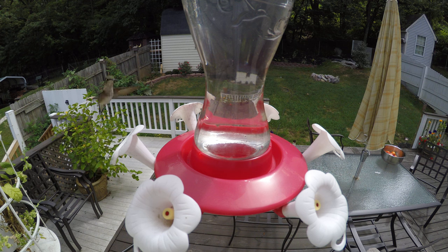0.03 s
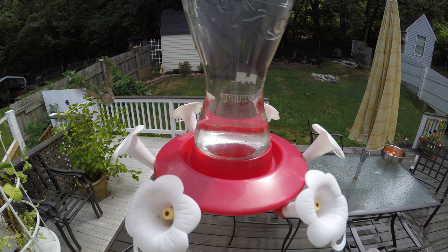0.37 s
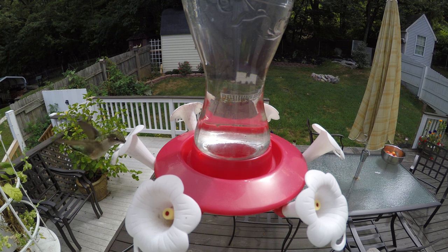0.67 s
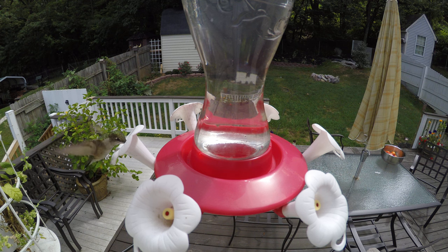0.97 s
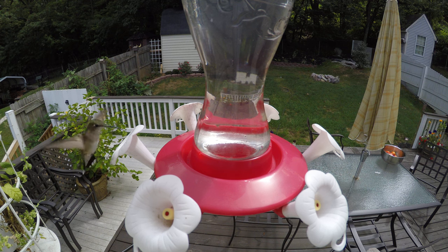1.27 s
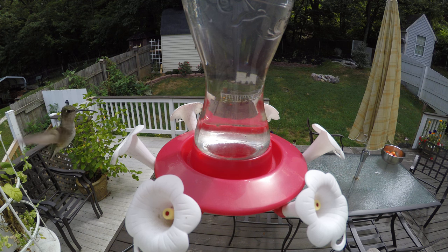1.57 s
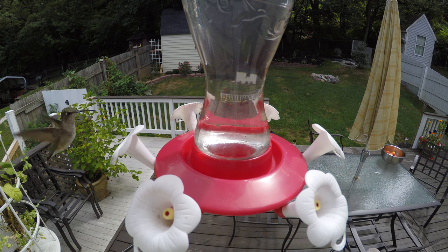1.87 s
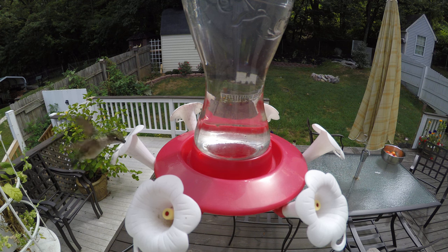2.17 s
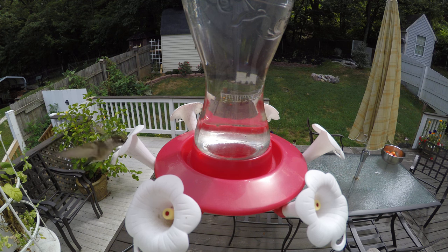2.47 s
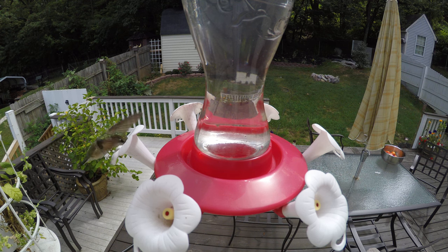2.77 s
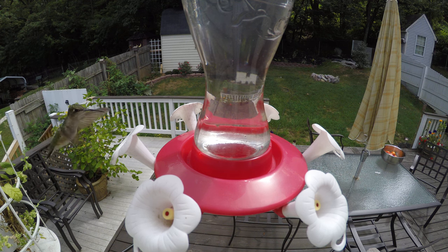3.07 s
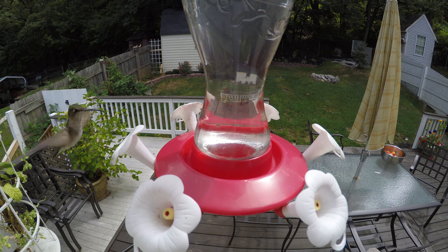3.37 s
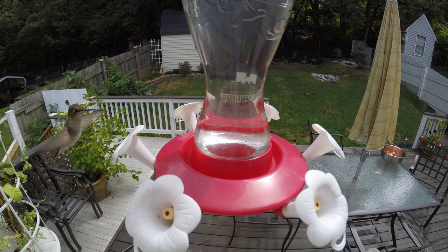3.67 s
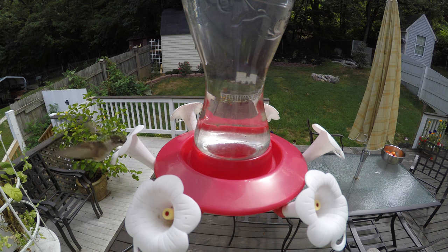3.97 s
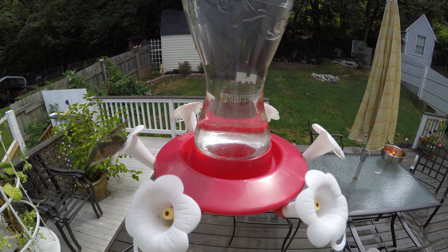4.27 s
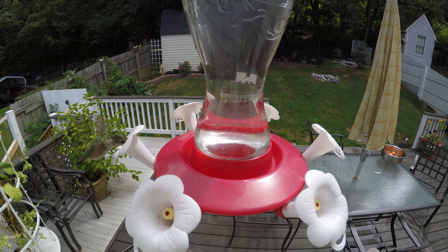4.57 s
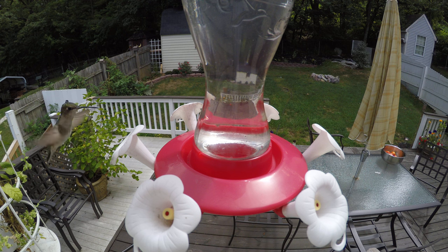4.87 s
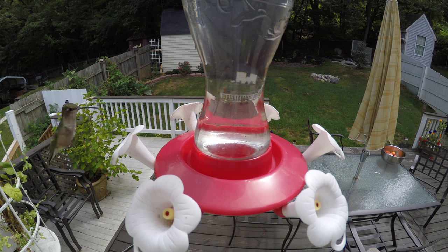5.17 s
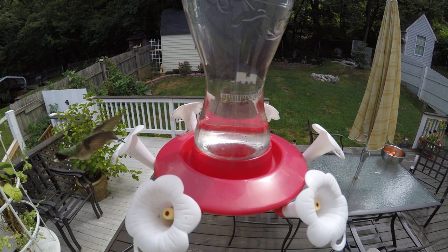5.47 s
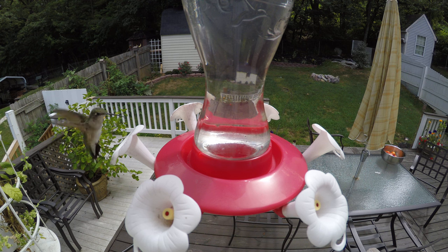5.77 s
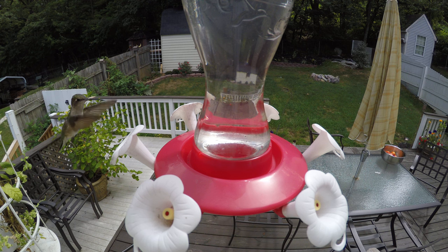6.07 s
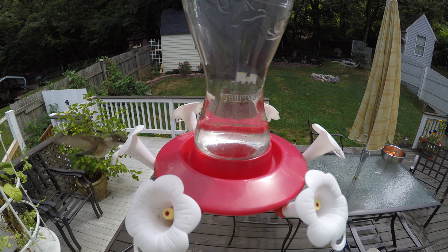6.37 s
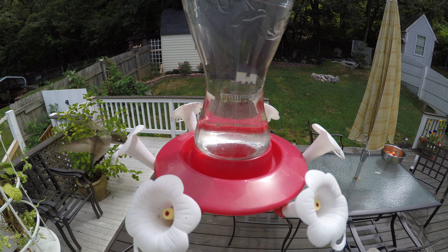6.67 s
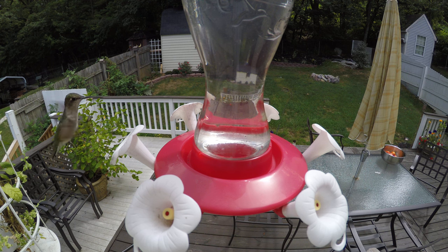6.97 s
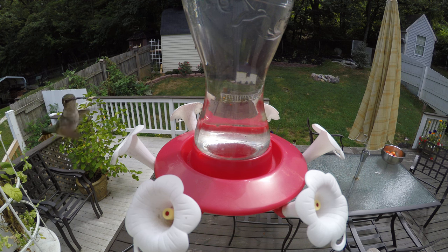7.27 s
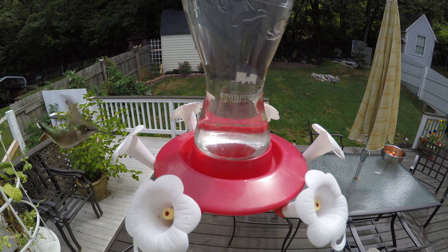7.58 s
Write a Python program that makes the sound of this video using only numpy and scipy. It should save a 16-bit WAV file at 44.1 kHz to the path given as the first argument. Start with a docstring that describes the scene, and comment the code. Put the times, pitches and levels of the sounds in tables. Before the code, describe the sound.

A hummingbird's wings hum close by while a truck drones past in the distance and a cricket trills over low traffic rumble.

```python
"""A low exhaust hum swells as an eight-cylinder truck comes along a road beyond the garden; its firing
tone then sinks in pitch as the tyres go by. Close at hand a hummingbird hovers at a feeder on the deck,
its wings pushing the air in about 47 beats a second. A small cricket scrapes its wings in short trilling
bursts, birds give a few thin chips, and far traffic rumbles below."""
import sys
import numpy as np
from scipy import signal
from scipy.fft import rfft, irfft
from scipy.io import wavfile
from scipy.ndimage import uniform_filter1d

SR = 44100
rng = np.random.default_rng(int(sys.argv[2]) if len(sys.argv) > 2 else 0)


def generate_wav(sig):
    """Save sig (samples, or channels by samples) to the path in sys.argv[1] as 16-bit PCM at SR."""
    pcm = np.round(np.clip(np.atleast_2d(sig).T, -1, 1) * 32767).astype(np.int16)
    wavfile.write(sys.argv[1], SR, pcm)


N = 341334
TIME = np.arange(N) / SR

# The engine note holds, then sinks as the truck goes by. Each row: time in seconds, firing rate in Hz.
FIRING_RATE = [(0, 125.3), (.75, 126.2), (1.02, 124.5), (1.35, 126.6), (1.85, 125.5), (2.45, 122.4),
               (3.7, 117.8), (4.45, 117.5), (5.3, 110.7), (6.2, 98), (7.74, 90.2)]
# The exhaust hum at the deck. Each row: time in seconds, level of the firing tone in dB.
HUM_LEVEL = [(0, -41), (.17, -37), (.3, -46), (.5, -31.5), (.67, -43), (.97, -31.5), (1.09, -33),
             (1.3, -23), (1.5, -19), (1.69, -27), (1.85, -27), (2.03, -33.5), (2.12, -42.5), (2.21, -29.5),
             (2.32, -38), (2.45, -34), (2.88, -30), (3.43, -32.5), (3.7, -43.5), (4.12, -34), (4.47, -38),
             (4.56, -44), (5.35, -42), (5.5, -51), (7.74, -82)]
# The rest of the exhaust. Each row: time in seconds, throb in dB, gas rush in dB.
EXHAUST_LEVELS = [(0, -47.5, -71), (.35, -44, -53.5), (.7, -39, -52), (1.1, -41, -46.5), (1.5, -37, -42.5),
                  (1.85, -41, -45), (2.15, -40, -55.5), (2.45, -52, -58), (3, -43.5, -54.5),
                  (3.7, -59, -60), (4.4, -51, -60), (5.1, -54, -53.5), (6, -44, -60), (6.6, -64, -74),
                  (7.74, -58, -56)]
# Lines due to uneven firing. Each row: multiple of the engine cycle, relative level in dB.
ENGINE_ORDERS = [(4, -14), (5, 3.5), (6, -9), (7, -6.5), (9, -23), (11, -10), (12, -27), (13, -9), (14, -6),
                 (15, -18.5), (17, -9), (18, -10), (19, -24), (20, -8), (21, -1), (22, -11.5), (23, -9.5),
                 (24, -12), (25, -12.5), (27, -22.5), (30, -11.5), (31, -16)]
# Tyres on the road. Each row: time in seconds, roar in dB, hiss in dB.
TYRE_LEVELS = [(0, -71, -78), (.8, -52.5, -62), (1.5, -57.5, -57), (2.4, -61.5, -61), (3.4, -51, -59.5),
               (4.3, -53.5, -59.5), (4.9, -53.5, -58.5), (5.35, -46.5, -55.5), (5.65, -48, -53),
               (5.9, -44, -52), (6.2, -46.5, -53.5), (6.55, -56, -56.5), (7.1, -57.5, -55.5),
               (7.45, -54, -56.5), (7.74, -51, -56.5)]
# The ground echo lags most when the truck is nearest. Each row: time in seconds, lag in seconds.
GROUND_LAG = [(0, .00112), (.8, .0012), (1.3, .00139), (1.9, .00155), (3.5, .002), (5.2, .0024),
              (5.55, .00236), (5.85, .00178), (6.4, .0017), (7.74, .002)]

# Hovering. Each row: time in seconds, wingbeats per second, beat tone in dB, stroke tone in dB.
HOVER = [(0, 51.5, -67, -53.5), (.75, 45, -58, -49), (1.02, 47, -48.5, -45.5), (1.45, 52, -44, -37.5),
         (1.75, 46, -49, -41.5), (2.5, 47.2, -51, -39), (3, 46.2, -52, -40.5), (3.45, 48.3, -42, -42.5),
         (4.15, 45.6, -45, -41), (4.9, 49.6, -46, -46.5), (5.23, 48.4, -43, -39.5), (5.4, 49, -53, -41.5),
         (6.36, 47.6, -49, -51.5), (6.52, 46.4, -59, -37), (6.68, 45.5, -52, -48.5),
         (6.95, 49.6, -43, -42.5), (7.32, 48, -48, -38), (7.47, 47.4, -47, -49.5), (7.67, 46, -43, -36.5),
         (7.74, 48, -54, -42)]
# The sharp edge of the strokes. Each row: multiple of the wingbeat, relative level in dB.
WING_OVERTONES = [(3, -6.5), (4, -6.5), (5, -10.5), (6, -17.5), (7, -21.5), (8, -18), (9, -26)]
# The low hum throbs in a few quick swells. Each row: middle in seconds, tone added to the stroke tone in dB.
HUM_THROBS = [(5.52, -38), (5.65, -36), (5.8, -37), (6.01, -33.5), (6.24, -34.5)]

# The cricket's vigour, low after its rest. Each row: time in seconds, pitch in Hz, direct level in dB.
CRICKET_VIGOUR = [(0, 7070, -55.9), (3.5, 7030, -56.4), (5.76, 6870, -57.3), (6.65, 6900, -56.2),
                  (7.74, 6920, -55.6)]
# Spells of song. Each row: start and end in seconds, initial sluggishness and unevenness from 0 to 1.
CRICKET_SONGS = [(0, 3.59, 0, .38), (5.76, 7.74, 1, .01)]
# Bird chips. Each row: middle and half length in seconds, pitch in Hz, glide in Hz per second,
# direct peak level in dB.
CHIPS = [(1.997, 0.054, 4624, -2000, -71), (2.145, 0.014, 5800, 45000, -68),
         (2.636, 0.064, 3800, -8000, -73), (4.153, 0.021, 3770, 4000, -69),
         (5.645, 0.0051, 6945, 140000, -54.5), (6.043, 0.0083, 7850, 15000, -66)]
# A puff of air. One row: middle and half length in seconds, frequency in Hz, peak level in dB.
GUST = (.55, .05, 53, -37)

# Noise spectra. Each row: frequency in Hz, relative spectral density in dB.
TAILPIPE_GAS = [(100, -3), (200, 4.5), (350, -2), (480, -4.5), (560, -7), (720, -5.5), (830, -14.5),
                (950, -12.5), (1250, -30.5), (2800, -33), (5000, -44.5)]
TYRE_ROAR = [(60, -16), (140, 3), (220, 0), (300, 7.5), (420, -1.5), (600, -3.5), (830, -9.5),
             (1000, -16.5), (1250, -14.5), (1500, -20.5), (1750, -13.5), (3000, -45.5)]
TYRE_HISS = [(500, -4), (1000, 3.5), (1800, 1), (2150, -0.5), (2600, 5), (2850, 7), (3250, -1.5), (4000, 0),
             (4450, -2.5), (5000, -7.5), (5500, -14.5), (6600, -8.5), (7600, -16), (9000, -34)]
WING_AIR = [(80, -11.5), (200, 4), (400, -6.5), (520, -5.5), (700, -31.5), (1500, -31), (4000, -46.5)]
FAR_TRAFFIC = [(12, -16), (28, 4), (48, 0), (65, 2), (100, 2.5), (150, -15.5), (200, -8.5), (300, -17),
               (430, -11), (600, -25), (900, -33.5), (1500, -50.5)]
LEAVES = [(400, 7), (1000, 3.5), (1700, 4), (2150, -0.5), (2800, -0.5), (3250, -4.5), (4200, -4.5),
          (5050, -1), (5500, -8.5), (7000, -7), (9000, -16), (12000, -22.5), (13000, -18.5), (16000, -27)]
FAR_INSECTS = [(5000, -42), (5800, -6.5), (6350, -2), (6700, 5.5), (7200, -2), (7600, 2), (8100, -8),
               (9000, -22.5), (11000, -46.5)]


def truck(cylinders=8):
    """Periodic firing gives a tone, uneven firing adds engine orders; gas and tyres give broad noise."""
    firing_hz, = in_time(FIRING_RATE)
    hum_db, = in_time(HUM_LEVEL)
    throb_db, gas_db = in_time(EXHAUST_LEVELS)
    roar_db, hiss_db = in_time(TYRE_LEVELS)
    firing = running_phase(firing_hz)
    hum = from_db(hum_db + 1.64 * drift(5.6)) * tone(firing)
    octave = from_db(-39.5) * swell(1.56, 0.47) * tone(2 * firing + 0.23 * drift(5))   # main swell only
    throb = from_db(throb_db) * uneven_firing(firing / cylinders)
    gas = from_db(gas_db) * noise(TAILPIPE_GAS) * (1 + 0.16 * np.cos(firing))   # a puff per firing
    roar = from_db(roar_db) * noise(TYRE_ROAR)
    hiss = from_db(hiss_db) * noise(TYRE_HISS)
    return hum + octave + throb + ground_echo(gas + roar) + hiss


def uneven_firing(cycle, waver_db=2.6, smear_rad=0.32, drift_hz=3.0):
    """A pattern repeating once a cycle has lines at its multiples; each wavers in level and phase."""
    lines = sum(from_db(db + waver_db * drift(drift_hz))
                * tone(round(order) * cycle + smear_rad * drift(drift_hz))
                for order, db in ENGINE_ORDERS)
    return unit_power(lines)


def ground_echo(direct, reflection=0.51):
    """Interference with a path off the ground combs the spectrum; the comb slides as the lag changes."""
    lag_s, = in_time(GROUND_LAG)
    reflected = np.interp(TIME - lag_s, TIME, direct)
    return (direct + reflection * reflected) / np.sqrt(1 + reflection ** 2)


def hummingbird(steer_hz=0.92, steer_db=2.0, steers_per_s=5.8, throb_half_s=0.057, throb_air_db=-16):
    """A periodic force on the air radiates harmonics: two strokes a beat, the downstroke the stronger."""
    beat_hz, beat_db, stroke_db = in_time(HOVER)
    beat = running_phase(beat_hz + steer_hz * drift(steers_per_s))
    hum_throbs = sum(from_db(db) * swell(middle, throb_half_s) for middle, db in HUM_THROBS)
    stroke_gain = from_db(stroke_db + steer_db * drift(steers_per_s)) + hum_throbs
    imbalance = from_db(beat_db + steer_db * drift(steers_per_s))
    strokes = np.sqrt(2) * (imbalance * np.cos(beat) + stroke_gain * np.cos(2 * beat))
    # The overtones peak nearly together, giving each beat a sharp edge.
    edge = sum(from_db(db + 3.63 * drift(11.8)) * np.cos(round(multiple) * beat + 0.49 * drift(13.7))
               for multiple, db in WING_OVERTONES)
    slow_trend = uniform_filter1d(stroke_gain, size=SR)
    puffs = unit_power(noise(WING_AIR) * from_db(3.3 * np.cos(beat)))
    air_gain = from_db(-54 + 2.55 * drift(3.7)) + from_db(throb_air_db) * hum_throbs
    return strokes + from_db(-2) * slow_trend * edge + air_gain * puffs


def cricket(closures_per_s=66, fall_hz=760, rise_hz=260, soft_start_db=-3, scrape_rad=0.6):
    """Stridulation: each wing closure is a falling note; through a burst they grow higher and louder."""
    pitch_hz, level_db = in_time(CRICKET_VIGOUR)
    envelope, glide_hz = np.zeros(N), np.zeros(N)
    for start, end in cricket_bursts():
        count = max(2, round((end - start) * closures_per_s))
        inside = (TIME >= start) & (TIME < end)
        progress = (TIME[inside] - start) / (end - start)
        closure = progress * count % 1   # 0 to 1 through each closure
        strength_db = rng.normal(0, 0.3, count)[(progress * count).astype(int)]
        onset_db = soft_start_db * (1 - progress) ** 2
        envelope[inside] = np.sin(np.pi * closure) ** 2 * from_db(strength_db + onset_db)
        glide_hz[inside] = rise_hz * (progress - .5) - fall_hz * (closure - .5)
    phase = running_phase(pitch_hz + glide_hz) + scrape_rad * drift(250)
    song = from_db(level_db) * envelope * tone(phase)
    return garden_scatter(song, t60_s=.07, wet_db=-4)


def cricket_bursts(burst_s=.062, pause_s=.023, extra_burst_s=.028, extra_pause_s=.122, warm_up_s=.6):
    """Sluggishness after a rest decays exponentially, so the bursts quicken. Yields each start and end."""
    for song_start, song_end, sluggish, uneven in CRICKET_SONGS:
        start = song_start
        for stretch in 1 + uneven * rng.uniform(-1, 1, size=100):
            slowness = sluggish * np.exp((song_start - start) / warm_up_s)
            end = start + stretch * (burst_s + slowness * extra_burst_s)
            if end > song_end:
                break
            yield start, end
            start = end + stretch * (pause_s + slowness * extra_pause_s)


def bird_chips(hoarse_rad=1.0):
    """Random phase modulation broadens each quick gliding tone into a slightly hoarse squeak."""
    waver = hoarse_rad * drift(200)
    calls = np.zeros(N)
    for middle, half_length, hz, glide, db in CHIPS:
        phase = running_phase(hz + glide * (TIME - middle)) + waver
        calls += from_db(db) * swell(middle, half_length) * tone(phase)
    return garden_scatter(calls, t60_s=0.16, wet_db=6.5)


def garden_scatter(direct, t60_s, wet_db):
    """Scattering from leaves, railings and walls leaves a short, exponentially decaying tail."""
    t = TIME[:SR // 2]
    tail = rng.standard_normal(len(t)) * from_db(-60 * t / t60_s)
    return direct + from_db(wet_db) * signal.fftconvolve(direct, tail / np.linalg.norm(tail))[:N]


def background():
    """Incoherent sources merge into steady noise: far traffic, leaves, insects. The air buffets once."""
    middle, half_length, gust_hz, gust_db = GUST
    gust = from_db(gust_db) * swell(middle, half_length) * tone(2 * np.pi * gust_hz * TIME)
    rumble = from_db(-42.5 + 0.44 * drift(2.1)) * noise(FAR_TRAFFIC)
    return rumble + gust + from_db(-56.5) * noise(LEAVES) + from_db(-65.5) * noise(FAR_INSECTS)


def from_db(db):
    """Amplitude grows tenfold for every 20 dB."""
    return 10 ** (np.asarray(db) / 20)


def unit_power(x):
    """Division by the RMS value gives unit power."""
    return x / np.sqrt(np.mean(x ** 2) + 1e-20)


def in_time(rows):
    """Linear interpolation gives each column of a timed table at every sample."""
    seconds, *columns = np.transpose(rows)
    return [np.interp(TIME, seconds, column) for column in columns]


def drift(corner_hz):
    """Low-pass filtered noise wanders slowly, with a spread of 1."""
    hop, settle = 40, 2000   # samples per step, steps for the filter to settle
    pole = np.exp(-2 * np.pi * corner_hz * hop / SR)
    white = rng.standard_normal(N // hop + settle + 2)
    slow = signal.lfilter([1], [1, -2 * pole, pole * pole], white)[settle:]
    return np.interp(np.arange(N) / hop, np.arange(len(slow)), unit_power(slow))


def noise(spectrum):
    """Spectral weighting colours white noise; the result has unit power."""
    hz, db = np.transpose(spectrum)
    bin_hz = np.maximum(np.fft.rfftfreq(N, 1 / SR), 1)
    gain = from_db(np.interp(np.log(bin_hz), np.log(hz), db))
    return unit_power(irfft(rfft(rng.standard_normal(N)) * gain, N))


def running_phase(hz):
    """Phase is the time integral of frequency."""
    return 2 * np.pi * np.cumsum(hz) / SR


def tone(phase):
    """Simple harmonic motion of unit power, starting anywhere in its cycle."""
    return np.sqrt(2) * np.sin(phase + rng.uniform(0, 2 * np.pi))


def swell(middle, half_length):
    """A Gaussian envelope, down to 1/e at half_length from its middle."""
    return np.exp(-((TIME - middle) / half_length) ** 2)


def scene():
    """Superposition: the pressures of all sources add at one point beside the feeder."""
    return (truck() + hummingbird() + cricket() + bird_chips() + background())[None]


def record(dry, cutoff_hz=15350):
    """An elliptic low-pass filter cuts the highest treble steeply."""
    return signal.sosfilt(signal.ellip(12, .1, 80, cutoff_hz, fs=SR, output="sos"), dry)


dry = scene()
out = record(dry)
generate_wav(out)
```